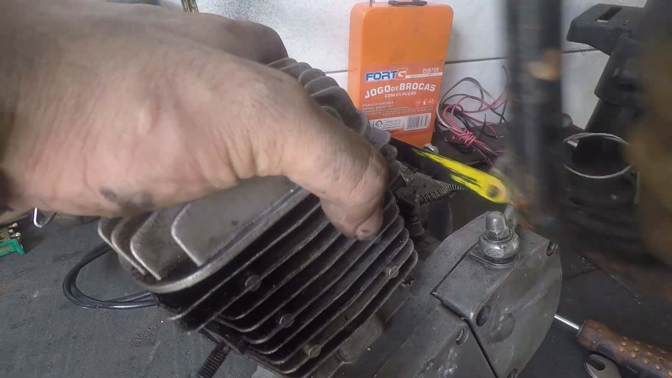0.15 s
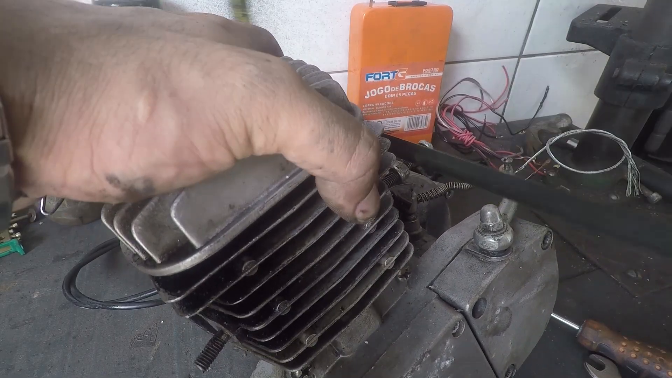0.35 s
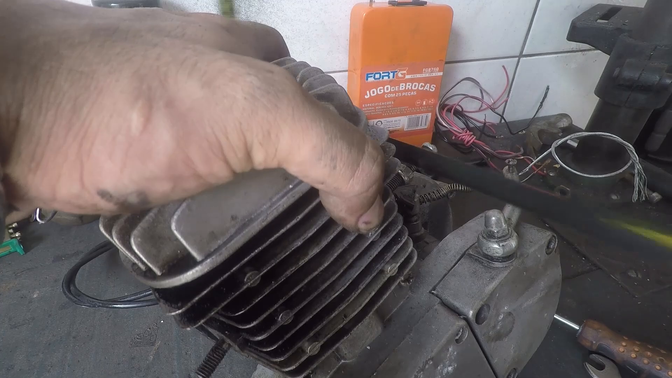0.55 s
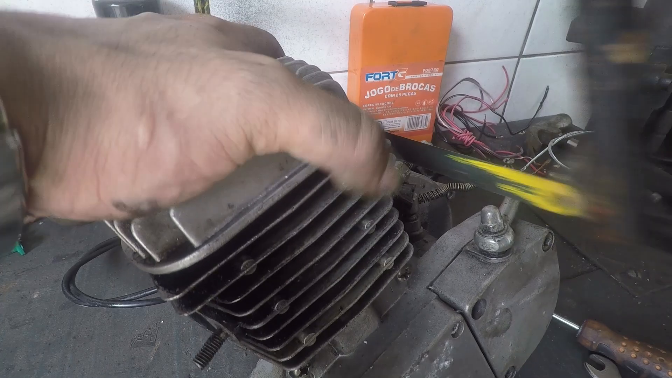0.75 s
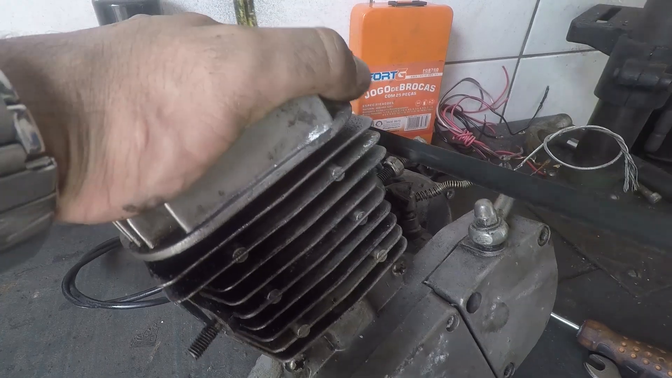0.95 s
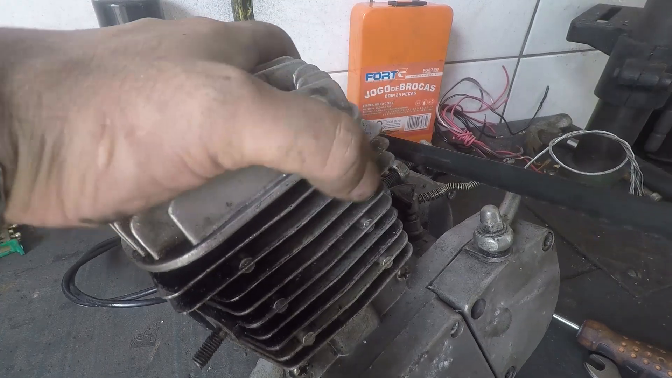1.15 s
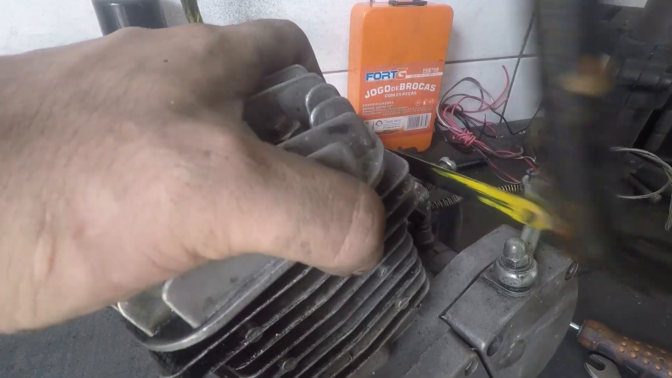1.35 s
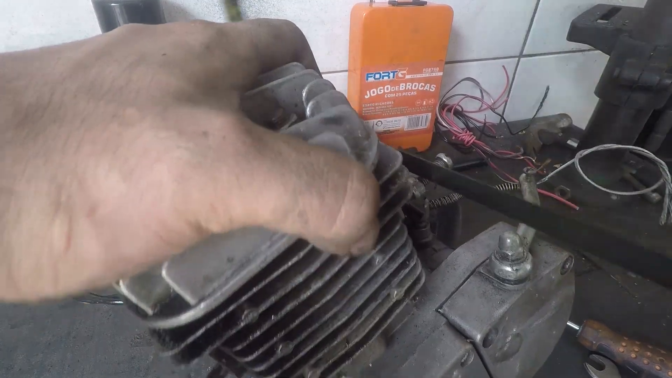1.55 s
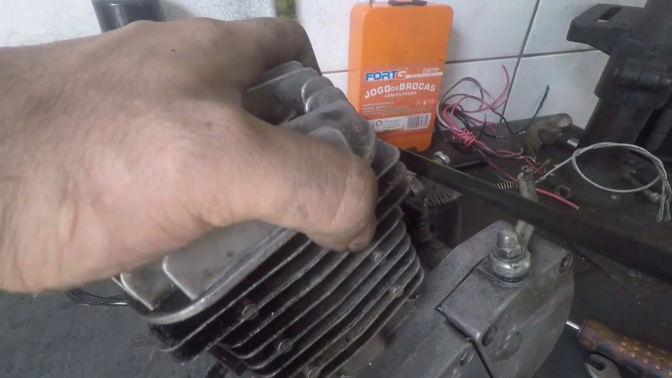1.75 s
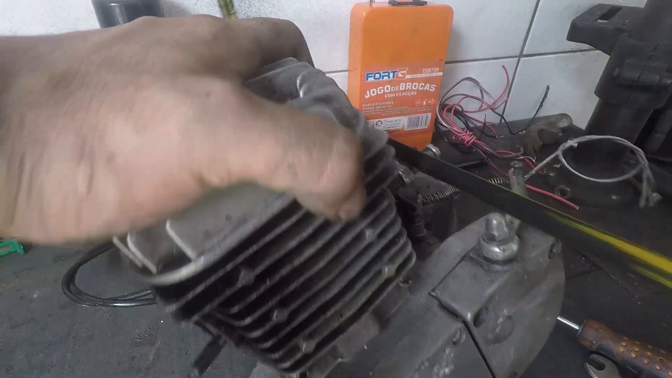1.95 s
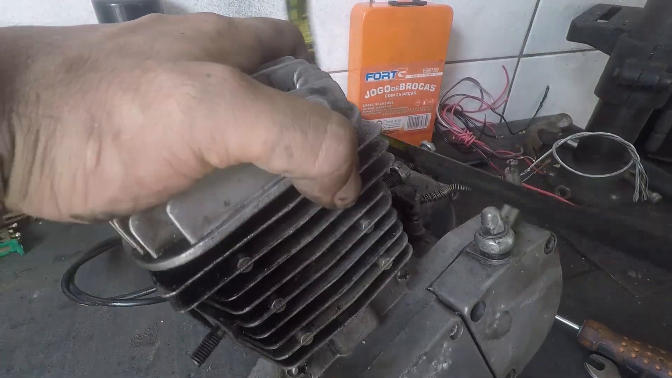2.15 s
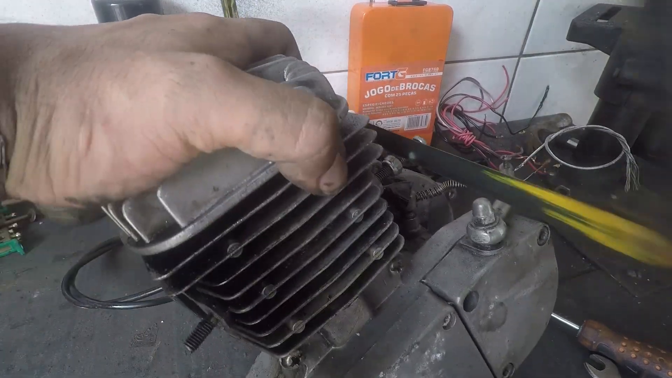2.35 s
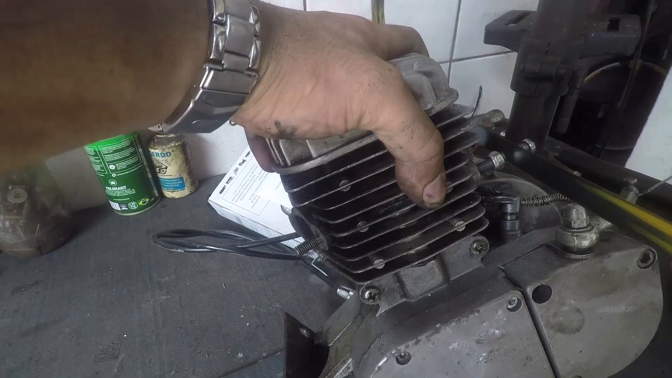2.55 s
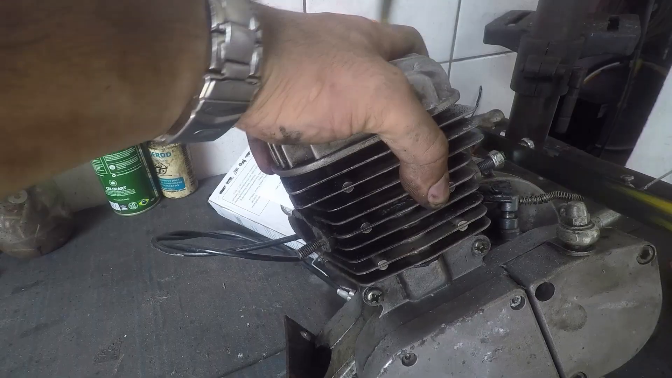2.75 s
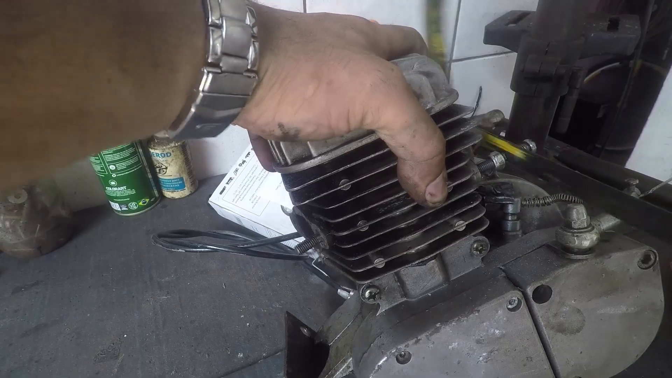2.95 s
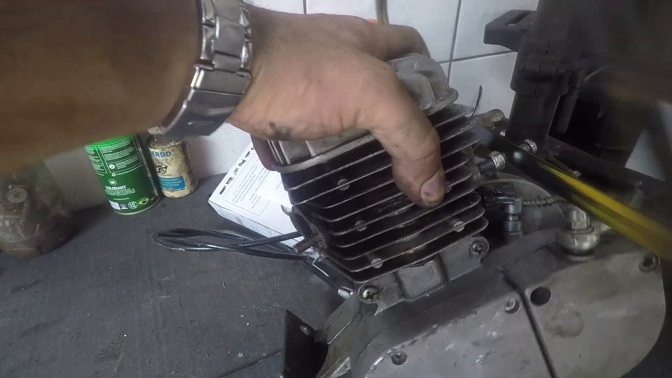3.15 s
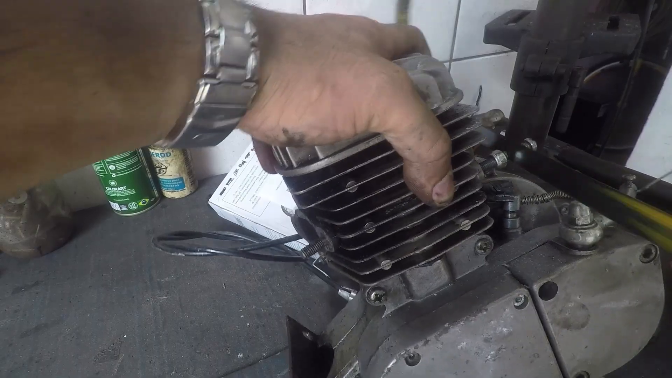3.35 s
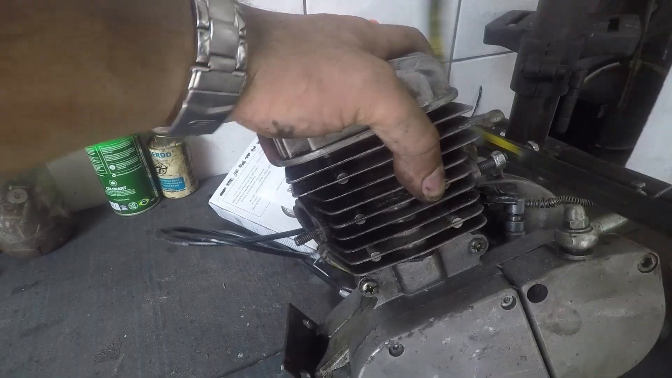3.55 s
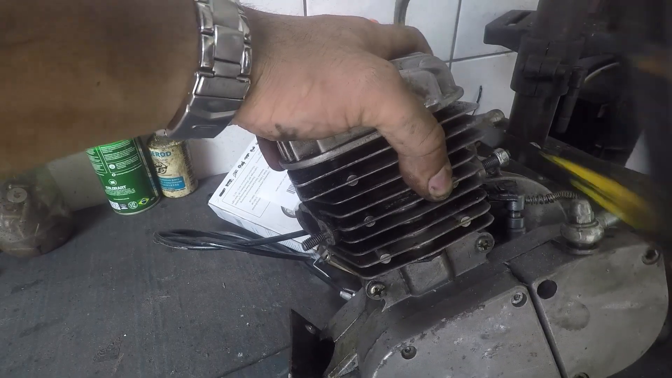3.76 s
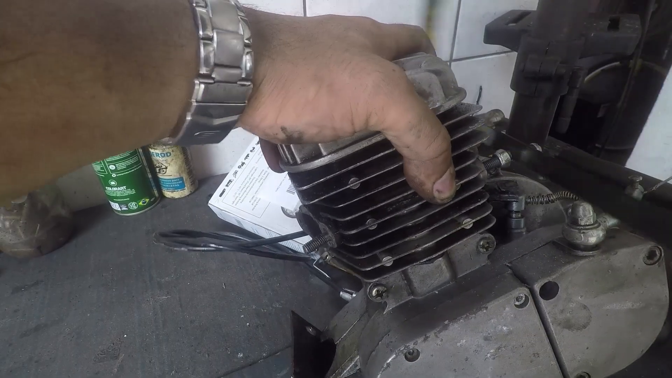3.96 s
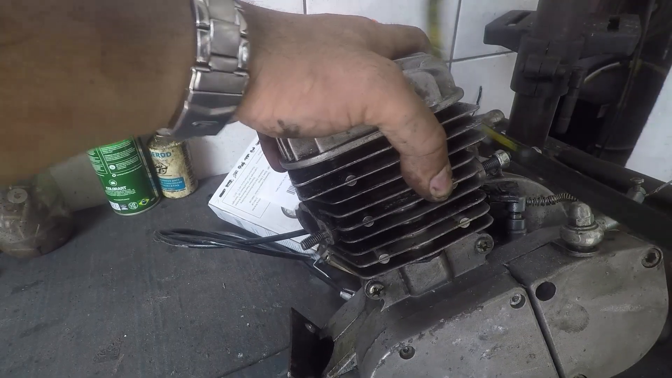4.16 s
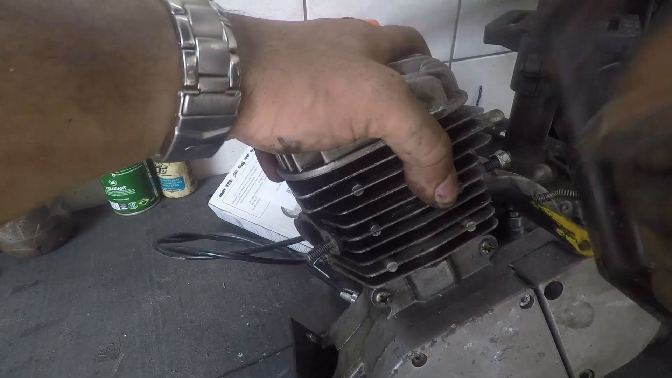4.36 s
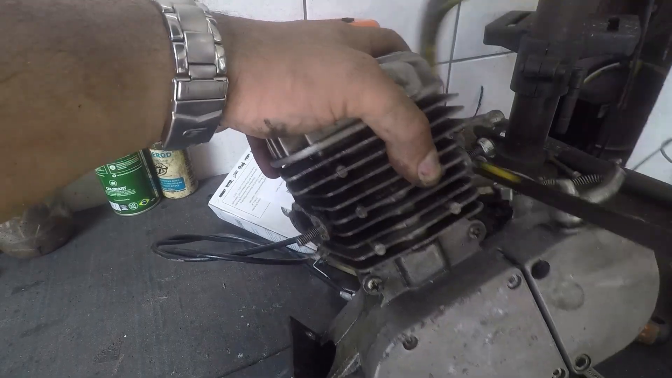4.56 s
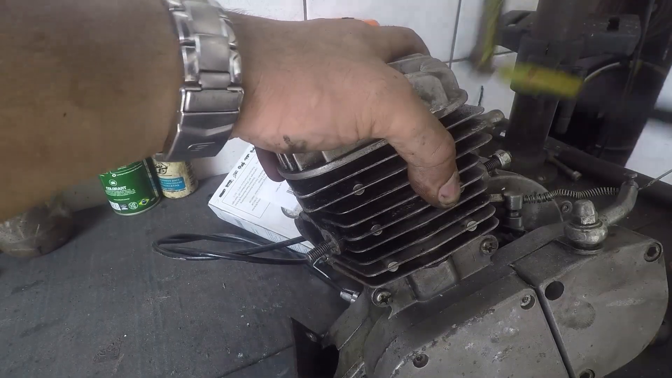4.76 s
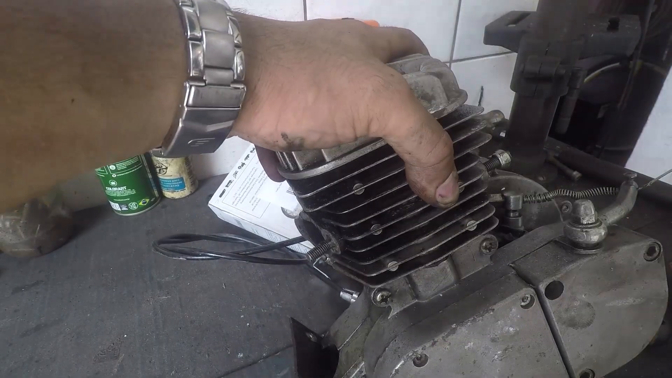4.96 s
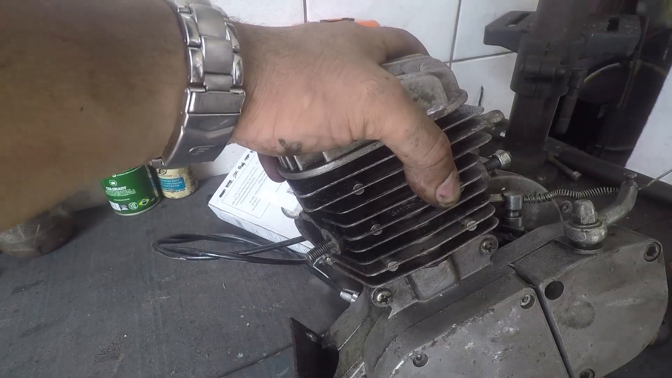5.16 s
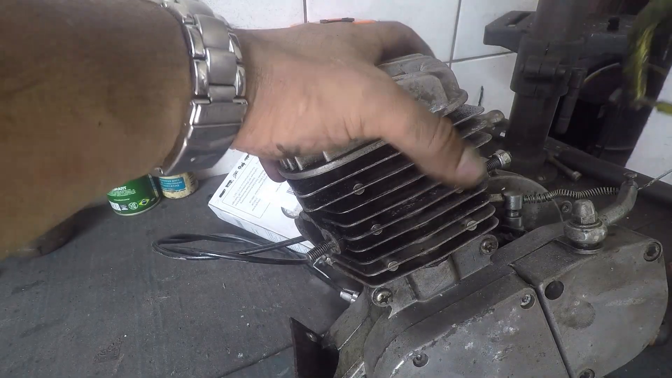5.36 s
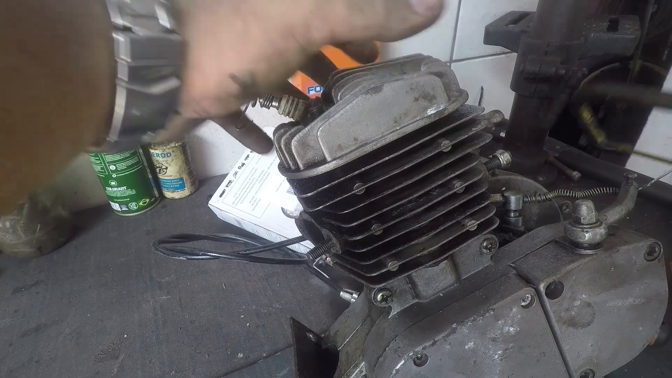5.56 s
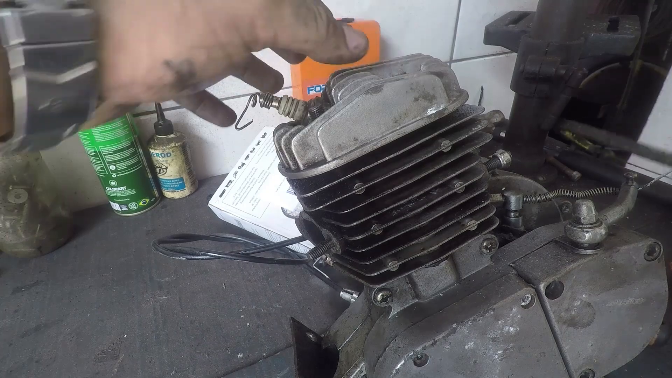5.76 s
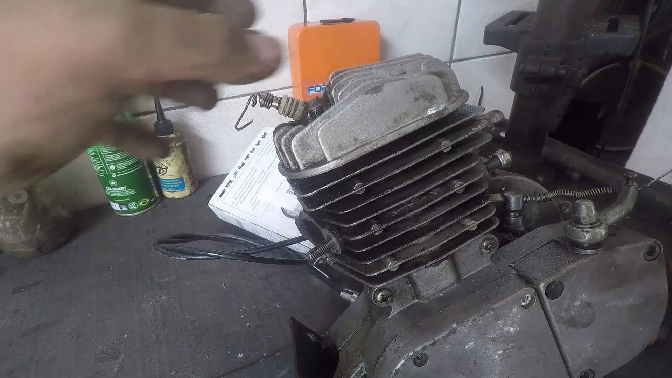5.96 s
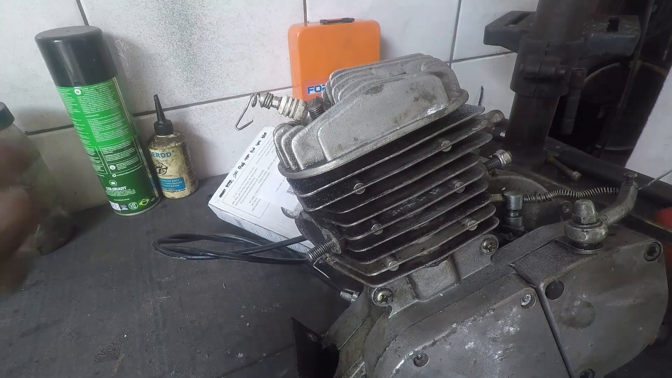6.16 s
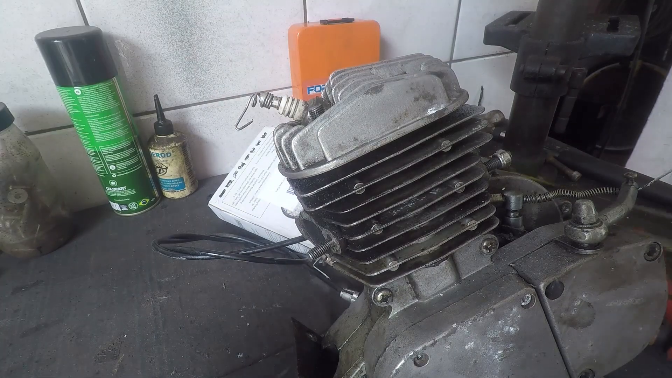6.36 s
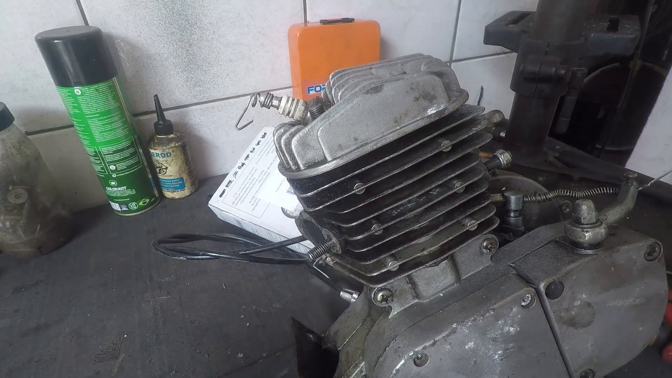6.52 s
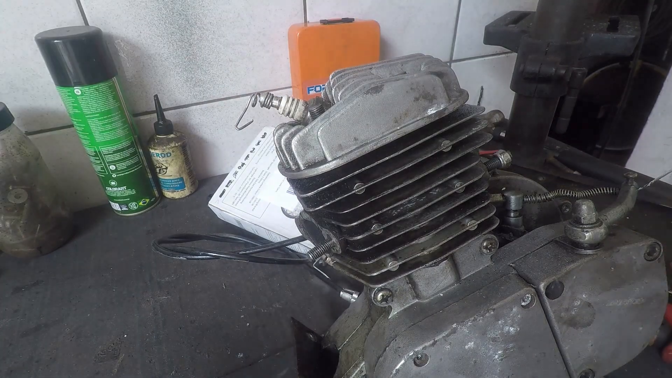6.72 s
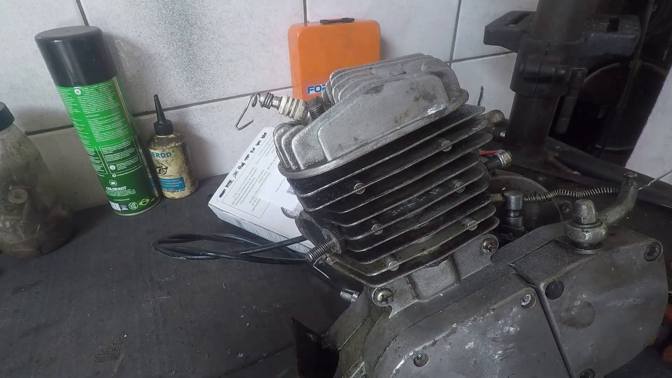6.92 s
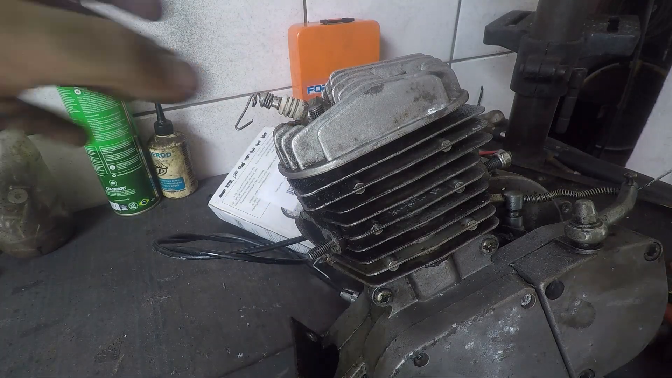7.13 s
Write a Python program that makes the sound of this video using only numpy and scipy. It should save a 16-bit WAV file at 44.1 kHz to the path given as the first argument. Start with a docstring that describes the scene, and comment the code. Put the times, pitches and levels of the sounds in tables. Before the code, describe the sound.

Bright, gritty metal sawing speeds up in a small hard workshop, stops with a rattling clatter, then light rustling and a few dull knocks.

```python
"""On a workshop bench, a hand hacksaw cuts a steel bolt on a small engine: nine easy strokes, then quick hard
ones. Noise of the passing teeth excites blade, frame and steel resonances; gliding tones whistle, groan and
squawk. Once the teeth catch in a sharp crack mid-stroke. The bench rumbles and booms in decaying modes, and the
freed blade twangs as a decaying sine. Noise cracks, struck modes and rubbing noise then give the saw being put
down and things knocked about. A small hard room adds its reverberation."""
import sys
import numpy as np
from scipy import signal
from scipy.fft import rfft, irfft
from scipy.io import wavfile
from scipy.ndimage import uniform_filter1d

SR = 44100
rng = np.random.default_rng(int(sys.argv[2]) if len(sys.argv) > 2 else 0)


def master_out(mix):
    """Clip the mix to full scale and print it as 16-bit PCM to the path in sys.argv[1]."""
    frames = np.transpose(np.atleast_2d(mix))
    ceiling = np.clip(frames, -1, 1)
    pcm = np.round(ceiling * 32767).astype(np.int16)
    wavfile.write(sys.argv[1], SR, pcm)


N = 317079
TIME = np.arange(N) / SR

# Pushes and pulls of the saw in turn. Each row: start, end, attack and release in seconds,
# rasp of the teeth in dB, blade ring in dB relative to it (both before the trims).
STROKES = [(0.039, 0.277, 0.13, 0.11, -21, -4), (0.29, 0.535, 0.064, 0.11, -21, -7),
           (0.543, 0.795, 0.087, 0.11, -21.5, -5.5), (0.825, 1.115, 0.059, 0.18, -26, -7),
           (1.25, 1.497, 0.078, 0.059, -24, -5), (1.512, 1.791, 0.076, 0.096, -20.5, -4.5),
           (1.803, 2.019, 0.092, 0.068, -22, -4), (2.025, 2.218, 0.054, 0.093, -20, -5),
           (2.24, 2.425, 0.055, 0.06, -20.5, -4.5), (2.432, 2.613, 0.069, 0.032, -18.0, -7.5),
           (2.625, 2.771, 0.046, 0.056, -16, -9.5), (2.77, 2.932, 0.063, 0.048, -16, -5),
           (2.92, 3.075, 0.052, 0.074, -16.5, -8.5), (3.083, 3.221, 0.041, 0.035, -20, -5),
           (3.229, 3.375, 0.071, 0.035, -17, -10.5), (3.378, 3.539, 0.06, 0.11, -18, -9.5),
           (3.535, 3.685, 0.053, 0.027, -18.5, -6.5), (3.695, 3.832, 0.055, 0.045, -16.0, -2.5),
           (3.841, 4.0, 0.049, 0.062, -16.0, -5.5), (4.01, 4.15, 0.038, 0.039, -19, -0.5),
           (4.153, 4.308, 0.043, 0.061, -18, -3), (4.317, 4.436, 0.046, 0.027, -17, -3)]


def from_db(db):
    """A level in decibels is twenty times the logarithm of the amplitude gain returned."""
    return 10 ** (np.asarray(db) / 20)


def rms_one(x):
    """Normalization: dividing by the root mean square gives unit power."""
    return x / np.sqrt(np.mean(x ** 2) + 1e-20)


def in_time(rows):
    """Linear interpolation: each column of a curve at every sample."""
    seconds, *columns = np.transpose(rows)
    return [np.interp(TIME, np.sort(seconds), column) for column in columns]


def at_hz(points, hz):
    """Interpolation of a table on a logarithmic frequency axis."""
    table_hz, values = np.array(points)[:, 0], np.array(points)[:, 1]
    return np.interp(np.log(np.maximum(hz, 1)), np.log(table_hz), values)


def colour(x, spectrum):
    """Spectral shaping: multiplying the Fourier transform filters a steady sound; rms 1."""
    bins_hz = np.arange(N // 2 + 1) * SR / N
    return rms_one(irfft(rfft(x) * from_db(at_hz(spectrum, bins_hz)), N))


def band(x, low_hz, high_hz, order=2):
    """Causal Butterworth band-pass: the pass band is maximally flat."""
    edges_hz = [low_hz, min(high_hz, SR / 2 - 1000)]
    sections = signal.butter(order, edges_hz, "band", fs=SR, output="sos")
    return signal.sosfilt(sections, x + 1e-18)


def drift(rate):
    """Random modulation: straight lines join chance values drawn rate times a second; rms 1."""
    return rms_one(np.interp(TIME * rate, np.arange(N // 8), rng.standard_normal(N // 8)))


def resonance(x, hz, width_hz):
    """Two-pole resonance: damping sets the width; gain 1 on top."""
    r = np.exp(-np.pi * width_hz / SR)
    poles = [1, -2 * r * np.cos(2 * np.pi * hz / SR), r * r]
    return signal.lfilter(np.array([1, 0, -1]) * (1 - r * r) / 2, poles, x)


def gliding_resonance(x, hz, width_hz):
    """Heterodyning: x is shifted down by the curve hz, low-passed and shifted back; gain 1 on top."""
    turn = np.exp(2j * np.pi * np.cumsum(hz) / SR)
    r = np.exp(-np.pi * width_hz / SR)
    return 2 * np.real(turn * signal.lfilter([1 - r], [1, -r], x / turn))


def ring(clicks, hz, t60):
    """Impulse response of a damped mode: a unit click starts a decaying sine of initial height 1."""
    r, w = np.exp(-np.log(1000) / (t60 * SR)), 2 * np.pi * hz / SR
    return signal.lfilter([0, np.sin(w)], [1, -2 * r * np.cos(w), r * r], clicks + 1e-18)


def add(out, s, sound):
    """Superposition: mix a sound in from time s."""
    start = max(round(s * SR), 0)
    out[start:start + len(sound)] += sound[:max(N - start, 0)]


def struck(blows, modes):
    """Modal excitation: every blow rings every mode, each with a strength of its own."""
    spread_db = 1.5
    out = np.zeros(N)
    luck = rng.standard_normal((len(blows), len(modes)))
    for k, (hz, mode_db, t60) in enumerate(modes):
        clicks = np.zeros(N)
        for (s, db), chance in zip(blows, luck[:, k]):
            add(clicks, s, from_db([db + mode_db + spread_db * chance]))
        out += ring(clicks, hz, t60)
    return out


def quiet_room():
    """Stationary noise: the room at rest has a fixed spectrum, strongest in the bass."""
    # Each row: frequency in Hz, relative level in dB per Hz.
    spectrum = [(25, -7), (45, -6), (90, -2.5), (125, -26), (220, -8.5), (600, -11.5), (1400, -18.5),
                (4200, -28.5), (6500, -37), (10000, -42.5), (15000, -44)]
    return from_db(-51.5) * colour(rng.standard_normal(N), spectrum)


def workshop(first_s=0.0029):
    """Reverberation: dense reflections after the nearest wall, the treble dying first; energy 1."""
    # Each row: frequency in Hz, reverberation time in seconds.
    room_t60 = [(150, 0.88), (1000, 0.5), (3500, 0.39), (7000, 0.38), (14000, 0.14)]
    t, edges_hz = TIME[:SR * 3 // 4], np.geomspace(70, 17000, 10)
    white = rng.standard_normal((2, len(t)))
    tail = np.zeros(len(t))
    for k, (low, high) in enumerate(zip(edges_hz, edges_hz[1:])):
        t60 = at_hz(room_t60, np.sqrt(low * high))
        tail += band(white[k % 2], low, high) * np.exp(-np.log(1000) * t / t60)
    tail *= t > first_s
    return tail / np.sqrt(np.sum(tail ** 2))


def blade_position():
    """Oscillating motion: the saw swings along half cosines between +1 and -1, at rest between strokes."""
    done = sum(np.clip((TIME - start) / (end - start), 0, 1) for start, end, *_ in STROKES)
    return -np.cos(np.pi * done)


def stroke_levels():
    """Effort sets level: rasp and blade ring in dB, held through each stroke."""
    return in_time([(s, db, blade_db) for start, end, _, _, db, blade_db in STROKES for s in (start, end)])


def slowing():
    """Reversal of motion: 1 at the turns, 0 at full speed, by each stroke's attack, hold and release."""
    corners = [corner for start, end, attack, release, _, _ in STROKES
               for corner in ((start, 1), (start + attack, 0), (end - release, 0), (end, 1))]
    return in_time(corners)[0] ** 1.79


def bench():
    """Forced and free vibration: the bench trembles with the sawing and booms when the engine rocks."""
    # Trembling of the bench. Each row: frequency in Hz, relative level in dB per Hz.
    rumble = [(12, -4.5), (20, -16.5), (33, -13), (59, 1.5), (75, 4), (124, -5), (157, -9), (182, -24),
              (221, -10.5), (300, -29), (390, -41.5), (660, -120)]
    # The engine rocks on the bench. Each row: time in seconds, level in dB.
    rocks = [(1.49, -23), (1.741, -22.5), (2.184, -22), (2.614, -7), (2.921, -16), (3.234, -12.5),
             (3.5, -9), (3.569, -4), (3.855, -16.5), (3.999, -20.5), (4.155, -11), (4.458, -8.5),
             (4.519, -13), (4.613, -12), (4.735, -12), (5.74, -25), (6.438, -28.5)]
    # Modes of the bench. Each row: frequency in Hz, level in dB, 60 dB decay time in seconds.
    bench_modes = [(30.7, -12.5, 0.13), (69.2, -8.5, 0.51), (80.2, -14, 0.15), (149.6, -17.5, 0.077)]
    tremble_db, at_turn_db = -13.5, 4  # relative to the stroke's level; weight of the rise at reversals
    settle_s, settle_db_per_s = 4.74, 153  # when the work stops the trembling dies away
    effort_db, _ = stroke_levels()
    sawn = TIME < STROKES[-1][1]
    reversing = slowing() * sawn * uniform_filter1d(1 - slowing(), SR // 6) * 2
    settling_db = settle_db_per_s * np.maximum(TIME - settle_s, 0)
    work = from_db(effort_db + tremble_db + at_turn_db * reversing - settling_db)
    return work * colour(rng.standard_normal(N), rumble) + struck(rocks, bench_modes)


def rubbing(swells, spectrum, rough_db, catches_per_s):
    """Friction noise: uneven catching modulates coloured noise that swells and fades."""
    swell = sum(from_db(db) * np.exp(-((TIME - s) / half) ** 2) for s, half, db in swells)
    roughness = from_db(rough_db * drift(catches_per_s))
    return swell * rms_one(roughness * colour(rng.standard_normal(N), spectrum))


def rustling():
    """Soft friction: slow unevenness and a low spectrum as a hand shifts things."""
    # Each row: middle in seconds, half length to 1/e in seconds, level in dB.
    rustles = [(5.392, 0.084, -43.5), (5.774, 0.15, -36.5), (7.087, 0.096, -42.5)]
    # Each row: frequency in Hz, relative level in dB per Hz.
    spectrum = [(60, -18), (200, -0.5), (330, 4.5), (700, -9), (1500, -22.5), (4500, -33), (12000, -59)]
    return rubbing(rustles, spectrum, rough_db=4, catches_per_s=60)


def skittering():
    """Gritty friction: fast unevenness and a brighter spectrum as things slide between the knocks."""
    # Each row: middle in seconds, half length to 1/e in seconds, level in dB.
    skitters = [(5.46, .08, -55.5), (5.7, 0.063, -34), (6.53, 0.078, -26)]
    # Each row: frequency in Hz, relative level in dB per Hz.
    spectrum = [(200, -7.5), (800, -5), (1500, -3), (2700, -5), (4500, -15), (9000, -33.5), (15000, -43)]
    return rubbing(skitters, spectrum, rough_db=4.5, catches_per_s=300)


def bumps():
    """Contact time limits bandwidth: the longer a soft blow on the bench top, the duller the thud."""
    # Each row: time in seconds, level in dB, length of the contact in seconds.
    thuds = [(0.255, -21, 0.00075), (0.272, -20, 0.0013), (4.737, -11, 0.0043), (6.177, -15, 0.0017),
             (6.305, -18.5, 0.0036), (6.436, -11.5, 0.0016), (6.484, -14, 0.00061), (6.49, -20, 0.00084),
             (6.742, -17.5, 0.0038), (7.14, -29, 0.0012)]
    # Modes of the bench top. Each row: frequency in Hz, level in dB, 60 dB decay time in seconds.
    top_modes = [(98.5, -9.5, 0.13), (218.4, -10, 0.33), (269, -3, 0.058), (331, -8, 0.048),
                 (408, -5.5, 0.028), (612, -11.5, .04)]
    pushes = np.zeros(N)
    for s, db, contact_s in thuds:
        push = np.hanning(max(round(contact_s * SR), 3))
        add(pushes, s, from_db(db) * push / push.sum())
    return sum(from_db(db) * ring(pushes, hz, t60) for hz, db, t60 in top_modes)


def hollow_clonk():
    """Modal ringing: one knock lands on something hollow."""
    # Each row: frequency in Hz, level in dB, 60 dB decay time in seconds.
    hollow_modes = [(788, 3.5, 0.045), (1700, 2, .057), (3230, 0, 0.046)]
    return struck([(6.2625, -15.5)], hollow_modes)  # time in s, level in dB


def knocks(rattle_db=-24, rattle_s=0.059):
    """Impact: each contact is a noise crack and a brief rattle, and rings the engine by its body level."""
    # Hard knocks, the first a sharp crack as the saw's teeth catch mid-stroke. Each row: time in seconds, #
    # clack in dB, body and edge in dB relative to it, 60 dB decay time in seconds (levels before the gains
    # below).
    contacts = [(3.4378, -7, -31.5, -5.5, 0.044), (4.4472, -8, -16, -11, 0.08),
                (4.4541, 3, -42, -10.5, 0.038), (4.4881, -11.5, -11, 4, 0.047),
                (4.5151, -7.5, -29, -7.5, 0.09), (4.6087, -2.5, -45, -4, 0.033),
                (4.6542, -9, -11, -18, 0.019), (4.6956, 7, -24, -5.5, 0.024),
                (4.7228, -10, -3.5, -20, 0.014), (4.806, -12, -9.5, -34, 0.024),
                (5.6174, -11, -23, -43, 0.12), (5.6606, -9, -24.5, -44, 0.086),
                (5.7343, -3.5, -22, -46, 0.04), (5.8353, -29, -4, -28, 0.13), (5.88, -21, -15, -30, 0.05),
                (6.0935, -10, -17, -35.5, 0.026), (6.2617, -10, 0, -44, 0.0094),
                (6.3592, -21, -16.5, -32, 0.063), (6.445, -5, -19, -7.5, 0.074),
                (6.5083, -3, -15.5, -41, 0.035), (6.537, -4.5, -7, -23, 0.018),
                (6.566, 1.5, -15.5, -35, 0.046), (6.733, -30, -38, 8.5, 0.038),
                (7.1776, -46.5, 12.5, -21, 0.058)]
    # Modes of the engine's fins. Each row: frequency in Hz, level in dB, 60 dB decay time in seconds.
    engine_modes = [(820, -27.5, 0.15), (899, -6.5, 0.06), (1105, -19, 0.1), (1350, -11, 0.11),
                    (1710, -13, 0.15), (3300, -31, 0.22), (4000, -19, 0.092)]
    out, t = np.zeros(N), TIME[:SR // 6]
    loose = from_db(rattle_db + 1.77 * drift(250))
    for s, clack_db, body_db, edge_db, t60 in contacts:
        noise = rng.standard_normal(len(t))
        crack = np.exp(-np.log(1000) * t / max(t60, .004))
        rattle = np.exp(-t / rattle_s) * np.roll(loose, -round(s * SR))[:len(t)]
        fade = crack + rattle
        body = from_db(body_db) * rms_one(band(noise, 553, 1840)) * fade
        clack = rms_one(band(noise, 1530, 3830)) * fade
        edge = from_db(edge_db) * rms_one(band(noise, 2200, 7500)) * crack ** 1.67
        add(out, s, from_db(clack_db) * (from_db(11) * body + clack + from_db(1) * edge))
    weights = [(s, clack_db + body_db) for s, clack_db, body_db, _, _ in contacts]
    return from_db(-8.5) * out + from_db(-4) * struck(weights, engine_modes)


def twang(wide_s=0.013, wide_db=10):
    """Large-amplitude vibration: the freed blade first swings wide and sharp, then settles to its own note."""
    # The freed blade: frequency in Hz, level in dB, 60 dB decay time in seconds.
    blade_note = (1567, -21, 0.34)
    start_s, rise_s, sharp_hz = 4.52, .002, 60
    hz, db, t60 = blade_note
    t = np.maximum(TIME - start_s, 0)
    wide = np.exp(-t / wide_s)
    decay = np.exp(-np.log(1000) * t / t60) + from_db(wide_db) * wide
    swing = (1 - np.exp(-t / rise_s)) * decay
    phase = 2 * np.pi * np.cumsum(hz + sharp_hz * wide) / SR
    return from_db(db + 0.98 * drift(200)) * swing * np.sin(phase)


def chatter():
    """Mode locking: for a moment the teeth bite in step with the frame in a rough harmonic squawk."""
    # Each row: middle in seconds, half length to 1/e in seconds, pitch in Hz, glide in Hz per second, level in dB.
    squawks = [(3.02, 0.014, 795, -1200, -17.5), (3.162, 0.022, 803, -1500, -12.5),
               (3.335, 0.011, 748, -2500, -19.5), (3.447, 0.011, 775, 1504, -13.5),
               (3.616, .018, 790, -1500, -19.5), (3.786, 0.027, 785, -400, -17)]
    # Each row: frequency in Hz, level of a harmonic there in dB.
    harmonics = [(790, 1), (1580, -8.5), (2370, -7.5), (3160, -5.5), (3900, 1), (4700, -8), (6200, -23.5),
                 (12000, -26)]
    jitter, rough_db = .025, 2.0
    out = np.zeros(N)
    waver, rough = 1 + jitter * drift(700), from_db(rough_db * drift(370))
    for s, half, hz, glide, db in squawks:
        on = np.abs(TIME - s) < np.pi * half
        t = TIME[on] - s
        phase = 2 * np.pi * np.cumsum((hz + glide * t) * waver[on]) / SR
        tone = sum(from_db(at_hz(harmonics, k * hz)) * np.sin(k * phase + 2 * np.pi * rng.random())
                   for k in range(1, 15))
        out[on] += from_db(db) * np.exp(-(t / half) ** 2) * rms_one(tone) * rough[on]
    return out


def whistles():
    """Gliding overtone: at the same place in every second stroke the blade flares up into a rough whistle."""
    # Each row: first and last time in seconds, start and end as shares of the stroke,
    # start and end pitch in Hz, level in dB relative to the stroke's rasp setting.
    glides = [(0.15, 2.35, 0.23, 0.51, 2255, 2487, -1.5), (0.15, 1.4, 0.52, 0.71, 2920, 3950, -4.5),
              (0.95, 2.1, 0.12, 0.31, 4170, 3166, -3), (2.7, 3.0, 0.37, .84, 3804, 3620, 0),
              (4.08, 4.38, 0.42, 1, 1964, 1620, -2.5)]
    width_hz = 260
    out, wobble = np.zeros(N), drift(width_hz) + 1j * drift(width_hz)
    ends = [stroke[1] for stroke in STROKES]
    for first_s, last_s, opens, closes, from_hz, to_hz, db in glides:
        first, last = np.searchsorted(ends, [first_s, last_s])
        for start, end, _, _, rasp_db, _ in STROKES[first:last + 1:2]:
            part = ((TIME - start) / (end - start) - opens) / (closes - opens)
            on = (part > 0) & (part < 1)
            phase = 2 * np.pi * np.cumsum(from_hz + (to_hz - from_hz) * part[on]) / SR
            tone = np.real(wobble[on] * np.exp(1j * phase))
            out[on] += from_db(rasp_db + db) * np.sin(np.pi * part[on]) * tone
    return out


def span_hz(position):
    """Bending of a bar: the lowest note of a blade span goes with one over the length squared."""
    middle_hz, travel = 705, .21
    return middle_hz / (1 + travel * position) ** 2


def blade_spans(force, position, far_db=-4):
    """Divided bar: the bolt parts the blade in two spans, one rising in pitch while the other falls."""
    # Higher bending modes of a span. Each row: multiple of its lowest note, width in Hz, level in dB.
    bending = [(2.76, 15, 7.5), (5.2, 43, 4.5), (8.9, 73, 0.5)]
    out = np.zeros(N)
    for multiple, width, db in bending:
        near = gliding_resonance(force, multiple * span_hz(position), width)
        far = gliding_resonance(force, multiple * span_hz(-position), width)
        out += from_db(db) * (near + from_db(far_db) * far)
    return out


def groan(position, drive_db, below_db=-23, width_hz=30):
    """Time-varying resonance: narrow filtering of noise gives a low, faint gliding groan under the strokes."""
    note = gliding_resonance(rng.standard_normal(N), span_hz(position), width_hz)
    return from_db(drive_db + below_db) * rms_one(band(note, 580, 2100))


def thrum(position, drive_db):
    """Tooth-passing frequency: a rough, unsteady note rises with the saw's speed and levels off."""
    top_hz, level_off, wander = 845, 9, 0.051  # level_off: speed in half strokes per s; wander: share of pitch
    speed = np.abs(np.gradient(position)) * SR
    hz = top_hz * np.tanh(speed / level_off) * (1 + wander * drift(25))
    note = gliding_resonance(rng.standard_normal(N), hz, width_hz=64)
    return from_db(drive_db - 19) * rms_one(band(note, 280, 1400))


def snags():
    """Stick-slip: extra bite in dB, sudden when the teeth catch, then fading as they tear loose."""
    # Each row: time in seconds, rise over the stroke in dB.
    catches = [(.879, 7.5), (1.279, 14.5), (2.042, 8), (2.643, 2.5), (3.255, 5)]
    fade_s = 0.015
    return sum(db * (TIME > s) * np.exp(-np.abs(TIME - s) / fade_s) for s, db in catches)


def teeth(position, per_stroke=130, jitter=0.0987):
    """Chip formation: teeth pass the bolt at a rate set by the saw's speed and modulate gritty noise."""
    grit, judder_db = .45, 1.3
    rate = per_stroke / 2 * np.abs(np.gradient(position))
    passed = np.cumsum(rate * (1 + jitter * drift(400)))
    chips = rng.standard_normal(N) * (1 + grit * np.cos(2 * np.pi * passed))
    return chips * from_db(judder_db * drift(220))


def sawing(sizzle_db=-20, sparkle_db=-20, treble_per_effort=.5, blade_trim_db=-0.83, rasp_trim_db=-0.26):
    """Source and filter: the tooth force sounds through steel as bright rasp, middle blade and low frame."""
    # Force of the teeth. Each row: frequency in Hz, relative level in dB per Hz.
    rasp_spectrum = [(120, -49.5), (200, -14), (548, -13), (683, -19.5), (791, 1.5), (950, -13.5),
                     (1710, -7.5), (1910, -9.5), (2420, -3.5), (2910, -8.5), (3830, 0.5), (5230, -9.5),
                     (11300, -21), (15100, -30), (16000, -48.5)]
    # Saw and engine ringing together. Each row: frequency in Hz, width in Hz, level in dB.
    steel_modes = [(880, 89, -10.5), (1140, 40, -21.5), (1590, 31, -1), (1721, 58, 0.5), (2400, 140, -13),
                   (3725, 92, -3), (4163, 340, -3), (6190, 430, -3), (7320, 60, 5.5), (9300, 35, -22),
                   (9400, 65, -19), (11200, 40, 0), (10900, 51, -4), (10900, 64, -9.5), (12700, 100, -10)]
    turn_dip_db, rest_db = 24.5, 4  # the rasp sinks as the saw slows, and further while it stands still
    frame_db, frame_follows = -12, 0.65  # relative to the rasp in mid-stroke; share of the dip followed
    case_db, case_follows = -37, 1  # level in mid-stroke, in dB; share of the dip followed
    thrum_follows = 0.57
    position = blade_position()
    force = colour(teeth(position), rasp_spectrum)
    fixed_modes = sum(from_db(db) * resonance(force, hz, width) for hz, width, db in steel_modes)
    steel = force + fixed_modes + blade_spans(force, position)

    effort_db, blade_db = stroke_levels()
    standing = uniform_filter1d(1. * (np.gradient(position) == 0), SR // 16)
    dip_db = turn_dip_db * slowing() + rest_db * standing
    pressure_db = 1.63 * drift(50)  # the hand's pressure wanders
    rasp_db = effort_db - dip_db + snags() + pressure_db
    cutting = uniform_filter1d(1. * (TIME < STROKES[-1][1]), SR // 100)

    rasp = from_db(rasp_trim_db) * rms_one(band(steel, 3185, 10200, order=4))
    blade = from_db(blade_db + blade_trim_db) * rms_one(band(steel, 1258, 2720, order=4))
    frame_level = from_db(frame_db + (1 - frame_follows) * dip_db)
    frame = frame_level * rms_one(band(steel, 200, 1470, order=4))
    # hard strokes sizzle and wake the highest steel modes
    sizzle = from_db(sizzle_db) * rms_one(band(force, 11030, 17030, order=4))
    sparkle = from_db(sparkle_db) * rms_one(band(fixed_modes, 7400, 18000))
    treble = from_db(treble_per_effort * (effort_db - effort_db.mean())) * (sizzle + sparkle)
    # the engine case hums under every stroke
    case = from_db(case_db - case_follows * dip_db) * rms_one(band(rng.standard_normal(N), 92, 200))
    notes = groan(position, effort_db - dip_db / 2) + thrum(position, effort_db - thrum_follows * dip_db)
    return cutting * (from_db(rasp_db) * (rasp + blade + frame + treble) + notes + case)


def scene():
    """Direct and reverberant sound: saw and knocks close by, in a small hard room."""
    background = quiet_room() + bench()
    handling = rustling() + skittering()
    blows = bumps() + hollow_clonk() + knocks()
    saw = twang() + chatter() + whistles() + from_db(-1.58) * sawing()
    sent = from_db(-15.5) * saw + from_db(-11.5) * blows
    echo = signal.fftconvolve(sent, workshop())[:N]
    return (background + handling + blows + saw + echo)[None]


def record(dry):
    """Band limiting: a steep elliptic low-pass removes the top above 15.7 kHz."""
    return signal.sosfilt(signal.ellip(10, .1, 80, 15700, fs=SR, output="sos"), dry)


dry = scene()
out = record(dry)
master_out(out)
```